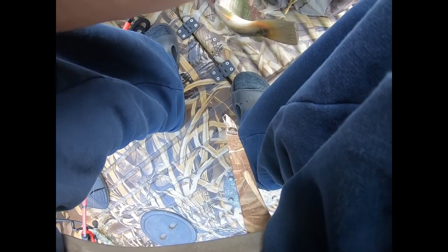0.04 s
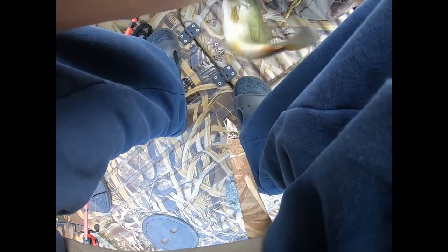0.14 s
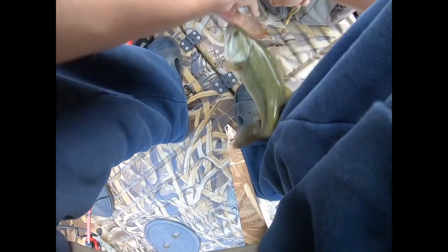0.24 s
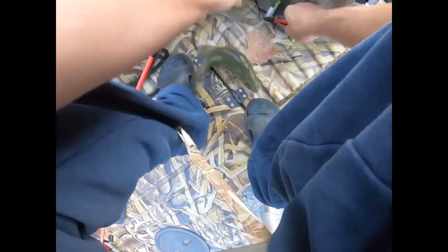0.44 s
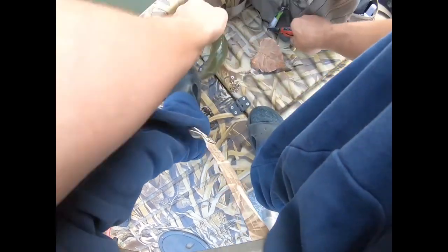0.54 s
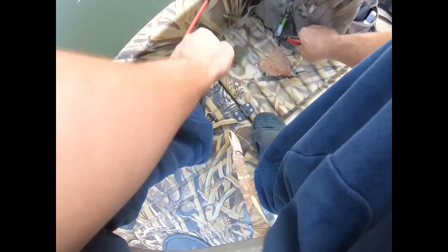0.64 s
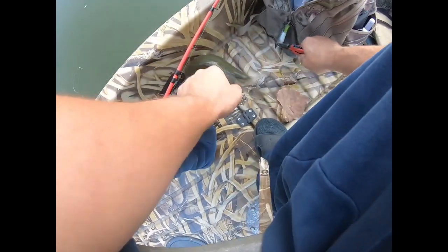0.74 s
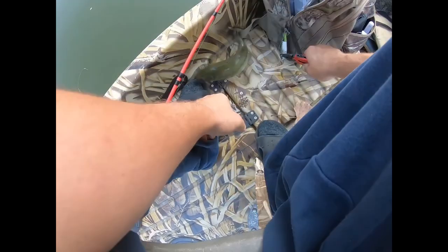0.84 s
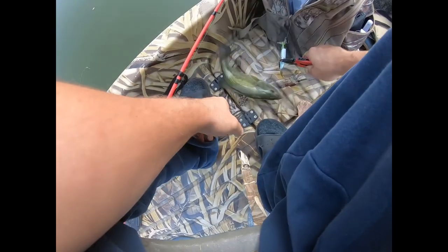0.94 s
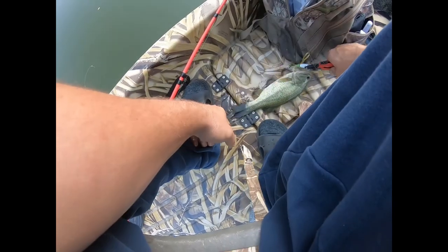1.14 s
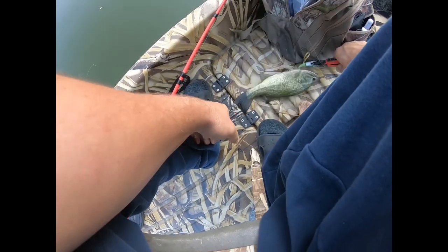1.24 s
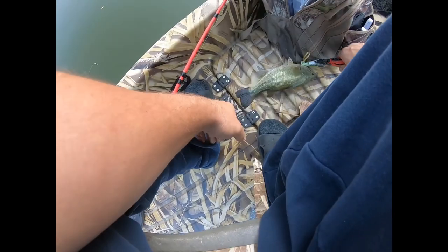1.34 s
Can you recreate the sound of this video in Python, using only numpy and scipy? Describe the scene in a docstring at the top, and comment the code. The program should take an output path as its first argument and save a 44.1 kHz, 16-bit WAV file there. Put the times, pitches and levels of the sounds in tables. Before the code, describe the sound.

A small wet fish flops on a boat floor, close by, over a low rumble and hum. Wet slaps begin at about 0.2 seconds as sleeves rustle. From 0.4 seconds its body thumps the floor in quick, uneven bursts, soon joined by sharp knocks. Loose tackle clicks between 0.75 and 1.05 seconds. The last thumps come near 1.2 seconds, followed by a few faint slaps.

```python
"""A small wet fish is dropped on the floor of a boat and flops about, close to the microphone.
The boat rumbles and hums from the start. At 0.2 s the first wet slaps of tail and fins come, and
sleeves rustle as an arm moves. From about 0.4 s the body thumps the floor and makes it ring, soon
joined by sharp knocks of head and tail. Loose tackle clicks between 0.75 and 1.05 s.
After the last thumps near 1.2 s, a few faint slaps are left over the rumble."""
import sys
import numpy as np
from scipy import signal
from scipy.fft import rfft, irfft, next_fast_len
from scipy.io import wavfile
from scipy.ndimage import map_coordinates

SR = 44100
rng = np.random.default_rng(int(sys.argv[2]) if len(sys.argv) > 2 else 0)


def to_wav(sig):
    """Store sig (one row per channel, or 1-D mono) as 16-bit WAV at the path in sys.argv[1].

    Samples outside -1..1 are clipped; the rate is SR.
    """
    pcm = np.clip(np.atleast_2d(sig), -1, 1) * 32767
    pcm = np.round(pcm).astype(np.int16)
    wavfile.write(sys.argv[1], SR, pcm.T)  # frames by channels


N = 61739

# The body landing: (time [s], level [dB], pitch [ratio], muffled above [Hz], ring length [ratio])
BODY_HITS = [(0.368, -24.5, 0.94, 443, 0.64), (.508, -16, 0.78, 403, 0.38), (0.5429, -8.5, 0.99, 700, 0.57),
             (0.583, -23, 0.86, 405, 1.9), (0.613, -9.5, 0.83, 407, 0.37), (0.6218, -13, 1.03, 480, 1.26),
             (.641, -20, 1.1, 507, 1.34), (0.66, -12, 1.0, 503, 0.3), (0.695, -10, .95, 414, 0.97),
             (0.757, -19.5, 0.75, 185, 1.96), (0.886, -4.5, 1.01, 175, 0.41),
             (0.923, -16.5, 1.13, 248, 1.24), (0.938, -16, 1.2, 278, 2.6), (0.9642, -7, 1.024, 321, 1.36),
             (1.12, -15, 0.96, 148, 1.6), (1.1593, -5.5, 1.07, 380, 0.73), (1.21, -24.5, 1.52, 348, 1.26),
             (1.235, -25, 1.27, 250, 1.4)]
# The floor's own notes, scaled by each hit. A fade time is how long a sound takes to drop 60 dB.
# (frequency [Hz], level [dB], fade time [s])
FLOOR_NOTES = [(94.6, -12, 0.18), (134.9, -4, 0.14), (202.5, -4, 0.092), (288.7, -8, 0.13),
               (338.4, -4, 0.094), (386.1, -4.5, 0.12), (475, -8.5, 0.084), (565.6, -11, 0.16)]
# Wet slaps: (time [s], level [dB], centre [Hz], fade time [s], level far from the centre [dB])
WET_SLAPS = [(0.174, -33, 4500, 0.015, -10), (0.2103, -15, 2930, 0.016, -16.5),
             (0.2162, -14, 14500, 0.01, -24.5), (0.2245, -25.5, 7100, 0.038, 2),
             (0.228, -22.5, 13000, 0.015, -28), (0.289, -26, 2300, 0.039, -33),
             (0.3217, -22, 4860, 0.042, -14.5), (0.3277, -20, 1910, 0.021, -63),
             (0.332, -19, 1930, 0.032, -44), (0.357, -28, 8600, 0.03, -12),
             (0.366, -21.5, 8500, 0.026, -12.5), (0.497, -24.5, 1680, 0.031, -3),
             (0.5096, -20, 2800, 0.025, -19), (0.54, -20.5, 3300, 0.028, -23),
             (0.5437, -10, 2740, 0.011, -8), (0.577, -21.5, 3900, 0.065, -5),
             (.5835, -21, 3600, 0.024, -28), (0.6115, -24, 4000, 0.036, -13),
             (0.6222, -14, 3500, 0.034, -3), (0.6345, -17.5, 4500, 0.019, -7),
             (0.639, -17.5, 4470, 0.043, -9), (0.657, -13, 6450, 0.016, -9),
             (0.665, -14.5, 8000, 0.013, -12), (0.6776, -20.5, 7000, 0.027, -13),
             (0.6943, -9.5, 5830, 0.014, -9.5), (0.728, -32, 7000, 0.039, -22),
             (0.774, -30.5, 4000, 0.035, 2), (0.831, -27, 7000, 0.036, -15),
             (0.8847, -17, 1310, 0.028, -21), (0.916, -25, 5000, 0.11, 3),
             (0.932, -17.5, 6800, 0.019, -7.5), (0.9372, -12.5, 5600, 0.011, -29),
             (.9442, -16, 4030, 0.0088, -9), (0.963, -19.5, 2600, 0.014, -1),
             (1.045, -30, 2850, 0.011, -22), (1.051, -35, 6900, 0.017, -25),
             (1.116, -26.5, 5260, 0.044, -12), (1.126, -27, 2080, 0.025, -9),
             (1.1475, -24.5, 5150, 0.02, -18), (1.1585, -16.5, 1520, 0.014, -9),
             (1.1694, -24.5, 1900, 0.015, -31), (1.209, -34, 3500, 0.069, -6),
             (1.232, -24.5, 3430, 0.026, -4), (1.2475, -22, 5700, 0.007, -19.5),
             (1.29, -30.5, 3500, 0.065, -9.5), (1.316, -33, 3000, 0.028, -12),
             (1.374, -31, 4020, 0.015, -11), (1.381, -34.5, 2020, 0.023, -57)]
# The tone all slaps start from: (frequency [Hz], level [dB])
SLAP_TONE = [(200, 3.5), (640, 3), (950, 6), (2000, 2), (3400, -2.5), (4800, -8.5), (7800, -2.5),
             (8900, -11), (10000, -8.5), (11200, -26.5), (14500, -23), (16500, -49)]
# Head and tail hitting a floor panel: (time [s], level [dB], pitch [ratio], muffled above [Hz])
HARD_HITS = [(.5445, -16.5, 1.52, 4500), (.584, -22.5, 1, 6000), (.624, -14.5, 1.02, 3500),
             (.639, -23, 0.97, 4000), (0.6579, -18, 1.22, 5960), (.696, -16, 0.944, 5970),
             (.8853, -15.5, 1.14, 1550), (.9639, -11.5, 0.91, 2600), (1.1592, -17.5, 1.13, 1690)]
# The panel's own notes, scaled by each hit: (frequency [Hz], level [dB], fade time [s])
PANEL_NOTES = [(865, 0.5, 0.011), (1012, 1.5, 0.0099), (1370, -0.5, 0.0064), (2150, -3.5, 0.003),
               (3510, -5.5, 0.012), (4860, 5, 0.0037)]
# The tail sliding: (peak time [s], level [dB], half length [s])
TAIL_SLIDES = [(0.226, -36.5, 0.015), (0.848, -30.5, 0.013)]
# The hiss of a slide: (frequency [Hz], level [dB])
SLIDE_TONE = [(1500, -12), (3200, 6.5), (4800, -4.5), (7800, 3), (9000, -11), (10000, -0.5), (11400, -42),
              (12500, -10), (14200, -16), (15500, -48)]
# Where the fish is: (time [s], left minus right [dB])
FISH_POSITION = [(.2, 4.5), (.4, 5.5), (.55, 1.5), (.9, -0.5), (1.3, -0.5)]
# The whole boat swaying: (peak time [s], level [dB], frequency [Hz], half length [s])
BOAT_SWAYS = [(.507, -16, 57.3, 0.012), (0.553, -13.5, 56, 0.011), (0.62, -15, 71, 0.0082),
              (0.804, -28, 89, 0.0079), (0.933, -25, 55.5, 0.029), (1.123, -20.5, 72.4, 0.012)]
# Loose tackle clicking: (time [s], level [dB], pitch [ratio])
TACKLE_CLICKS = [(0.7508, -26, 0.97), (0.7788, -20.5, 1), (0.8314, -20.5, 0.92), (0.8416, -19, 1.03),
                 (0.8519, -25.5, 1.13), (0.8667, -26, 1.03), (.899, -23, .94), (0.9043, -15.5, 0.94),
                 (0.9365, -12, 0.98), (1.0484, -26, 1.05)]
# The tackle's own notes, scaled by each click: (frequency [Hz], level [dB], fade time [s])
TACKLE_NOTES = [(2485, -9.5, 0.014), (2790, 2.5, 0.011), (3410, -1, 0.013), (7380, -22, 0.014)]
# The scrape in a click: (frequency [Hz], level [dB])
SCRAPE_TONE = [(600, 2), (3000, 0), (5000, -5), (8000, -11), (11500, -32), (16000, -42)]
# How loud the sleeves are: (time [s], level [dB])
SLEEVE_LEVEL = [(0, -61.5), (.2, -60.5), (.225, -54), (.27, -41.5), (.36, -47), (.44, -39.5), (.55, -47),
                (.68, -49.5), (.8, -46.5), (.93, -48), (.99, -52.5), (1.09, -55), (1.25, -51), (1.4, -52)]
# The tone of rubbing cloth: (frequency [Hz], level [dB])
SLEEVE_TONE = [(350, -23), (600, -9.5), (1150, 1), (1850, 4), (2700, 0.5), (4000, 0), (5500, -4), (8000, 1),
               (8900, -9.5), (9900, -6.5), (11300, -19.5), (14300, -20.5), (16000, -53)]
# The tone of the boat's rumble: (frequency [Hz], level [dB])
RUMBLE_TONE = [(15, -69), (25, -28.5), (76, -11), (97, -10), (203, -20.5), (259, -20), (324, -27.5),
               (446, -32.5), (645, -40), (786, -38.5), (1140, -37.5), (1420, -46.5), (9000, -85),
               (11700, -102), (19800, -120)]
# How loud the rumble is: (time [s], level [dB])
RUMBLE_LOUDNESS = [(0, -34.5), (.45, -33.5), (.8, -36), (1.07, -36), (1.28, -43), (1.4, -39.5)]
# The boat's two humming notes: (frequency [Hz], level [dB])
HUM_NOTES = [(92, -40.5), (116, -45.5)]
# How the hum is turned up and down: (time [s], added level [dB])
HUM_GAIN = [(0, 8.5), (.4, -1.5), (.8, -18), (1.3, -10)]
# A clean tone above the hum that swells early on: (time [s], level [dB])
DRONE_LEVEL = [(0, -54), (.2, -45), (.39, -37), (.6, -42.5), (1.4, -58)]
# How long the boat's sides echo: (frequency [Hz], fade time [s])
ECHO_FADE = [(100, 0.067), (400, 0.17), (1500, 0.11), (10000, 0.028)]
# How alike a noise is on the left and right: (frequency [Hz], likeness [0 to 1])
STEREO_LIKENESS = [(50, 0.93), (250, 1), (600, 0.48), (2000, 0.76), (4500, 0.58), (8000, 0.19),
                   (15000, 0.083)]
# The microphone's lean to one side: (frequency [Hz], left minus right [dB])
MIC_BALANCE = [(30, -4), (100, -0.5), (1000, -1), (3000, 0.1), (8000, 0.7), (13000, 1.5)]

SPATTER_PER_S = 850  # how fast the wet sounds flicker
LEFT_RIGHT = np.array([[.5], [-.5]])  # shares a left-minus-right level between the two sides


def body_thumps():
    """The body pushes the floor down and rings it; a fish lying flat cuts the ring short."""
    out = np.zeros((2, N))
    boom_top_hz = 527
    boom = lambda hz: 1 / (1 + (hz / boom_top_hz) ** 12) + .003
    for s, db, pitch, soft_hz, ring in BODY_HITS:
        tone = lambda hz: muffled(hz, soft_hz) * boom(hz)
        add(out, s, -amp(db) * blow(FLOOR_NOTES, pitch, ring, detune=0.016, tone=tone))
    return out


def wet_slaps():
    """Wet skin, tail and fins hit the floor, each time with a short, spattering burst of noise."""
    lead_s, width_octaves, spatter_db = .003, 0.96, 3
    out = np.zeros((2, N))
    t = np.maximum(np.arange(SR // 8) / SR - lead_s, 0)
    for s, db, centre_hz, fade_s, far_db in WET_SLAPS:
        near_centre = lambda hz: np.exp(-.5 * (np.log2((hz + 1) / centre_hz) / width_octaves) ** 2)
        tone = lambda hz: along(SLAP_TONE, hz) + far_db * (1 - near_centre(hz))
        shape = fade(t, rise_s=.04 * fade_s, fade_s=fade_s)
        spatter = amp(spatter_db * wobble(SPATTER_PER_S, len(t)))
        burst = noise(tone, len(t), shape * spatter)
        add(out, s - lead_s, amp(db) * np.sqrt(np.mean(shape ** 2)) * unit(burst))
    return out


def hard_knocks():
    """Head and tail smack the floor panel with one sharp crack each."""
    out = np.zeros((2, N))
    bass_cut_hz = 763
    thin = lambda hz: 1 - 1 / (1 + (hz / bass_cut_hz) ** 6)
    for s, db, pitch, soft_hz in HARD_HITS:
        tone = lambda hz: muffled(hz, soft_hz) * thin(hz)
        add(out, s, amp(db) * blow(PANEL_NOTES, pitch, ring=0.98, detune=0.052, tone=tone))
    return out


def tail_slides():
    """The wet tail brushes the floor with a bright, grainy hiss."""
    grain_db = 4.5
    level = sum(amp(db) * swell(s, half_s) for s, db, half_s in TAIL_SLIDES)
    grain = unit(amp(grain_db * wobble(SPATTER_PER_S, N)))
    return level * grain * noise(lambda hz: along(SLIDE_TONE, hz), N)


def boat_sways():
    """Shifting weight rocks the whole boat for a few deep swings."""
    t = np.arange(N) / SR
    return sum(amp(db) * np.cos(2 * np.pi * hz * (t - s)) * swell(s, half_s)
               for s, db, hz, half_s in BOAT_SWAYS)


def tackle_clicks():
    """Loose tackle rings briefly, a little differently each time, and scrapes where it touches."""
    out = np.zeros((2, N))
    t = np.arange(SR // 20) / SR
    scrape_db = -9
    for s, db, pitch in TACKLE_CLICKS:
        for k, (hz, note_db, fade_s) in enumerate(TACKLE_NOTES):
            note_hz = hz * pitch * (1 + rng.normal(0, 0.078))
            phase = 2 * np.pi * note_hz * t + rng.normal(0, 0.079, (2, 1))
            gain = (-1) ** k * amp(db + note_db + rng.normal(0, 1))
            add(out, s, gain * np.sin(phase) * fade(t, rise_s=0.00027, fade_s=fade_s))
    for s, db, pitch in TACKLE_CLICKS:
        scrape = noise(lambda hz: along(SCRAPE_TONE, hz / pitch), len(t))
        add(out, s, amp(db + scrape_db) * scrape * fade(t, rise_s=0.00042, fade_s=0.018))
    return out


def sleeves():
    """Cloth rubs with a grainy rustle as an arm moves."""
    grain_db = 1.6
    grain = unit(amp(grain_db * wobble(per_s=220, size=N)))
    return amp(curve(SLEEVE_LEVEL)) * grain * noise(lambda hz: along(SLEEVE_TONE, hz), N)


def boat_echo(sound):
    """The boat's sides throw back a short echo, different at each ear."""
    hz, t, hiss = signal.stft(rng.standard_normal((2, SR // 4)), SR, nperseg=256)
    dying_away = np.exp(-np.log(1000) * t / along(ECHO_FADE, hz)[:, None])
    echo = signal.istft(hiss * dying_away, SR, nperseg=256)[1]
    return signal.fftconvolve(sound, echo / np.linalg.norm(echo[0]), axes=1)[:, :N]


def boat_rumble():
    """The boat makes a low noise, with a wavering hum and a steadier tone above it."""
    t = np.arange(N) / SR
    waver_radians, drone_hz = 0.76, 209.9
    hum = sum(amp(db) * unit(np.sin(2 * np.pi * hz * t + waver_radians * wobble(per_s=10.49, size=N)))
              for hz, db in HUM_NOTES)
    drone = amp(curve(DRONE_LEVEL)) * unit(np.sin(2 * np.pi * drone_hz * t))
    rumble = amp(curve(RUMBLE_LOUDNESS)) * noise(lambda hz: along(RUMBLE_TONE, hz), N)
    return rumble + amp(curve(HUM_GAIN)) * hum + drone


def blow(notes, pitch, ring, detune, tone):
    """One push rings all the notes, detuned as the fish hits a new spot; tone turns Hz into gain."""
    hz = np.fft.rfftfreq(16384, 1 / SR)
    spectrum = 0
    for k, (note_hz, db, fade_s) in enumerate(notes):
        radians_per_s = 2 * np.pi * note_hz * pitch * (1 + detune * rng.standard_normal())
        damping = np.log(1000) / (fade_s * ring)
        resonance = radians_per_s / ((2j * np.pi * hz + damping) ** 2 + radians_per_s ** 2)
        spectrum = spectrum + (-1) ** k * amp(db) * SR * resonance
    return sudden_pulse(np.abs(spectrum) * tone(hz))


def sudden_pulse(spectrum):
    """The pulse that has this spectrum and all its energy as early as possible."""
    cepstrum = irfft(np.log(np.maximum(spectrum, 1e-6)))
    half = len(cepstrum) // 2
    folded_forward = np.r_[cepstrum[0], 2 * cepstrum[1:half], np.zeros(half)]
    return irfft(np.exp(rfft(folded_forward)))


def muffled(hz, soft_hz):
    """A soft hit barely rings the high notes."""
    return 1 / np.hypot(1, (hz / soft_hz) ** 2)


def noise(tone, size, shape=1):
    """Stereo noise as strong as its shape, centred in the bass, wide up high; tone turns Hz into dB."""
    def gains(hz):
        spread = np.arccos(np.clip(along(STEREO_LIKENESS, hz), -1, 1)) / 2
        return amp(tone(hz)) * [np.cos(spread), np.sin(spread)]
    mid, side = filtered(shape * rng.standard_normal((2, size)), gains)
    return unit(np.array([mid + side, mid - side])) * np.sqrt(np.mean(shape ** 2))


def filtered(sound, gain):
    """Turns each frequency up or down by gain(hz)."""
    size = sound.shape[-1]
    padded = next_fast_len(size + 4096)
    return irfft(rfft(sound, padded) * gain(np.fft.rfftfreq(padded, 1 / SR)), padded)[..., :size]


def fade(t, rise_s, fade_s):
    """A quick rise, then a fall of 60 dB every fade_s seconds."""
    return (1 - np.exp(-t / rise_s)) * np.exp(-np.log(1000) * t / fade_s)


def swell(s, half_s):
    """A smooth rise and fall around time s."""
    return np.exp(-((np.arange(N) / SR - s) / half_s) ** 2)


def wobble(per_s, size):
    """A smooth curve through per_s random values a second."""
    return map_coordinates(rng.standard_normal(4096), [np.arange(size) * per_s / SR], mode="wrap")


def curve(rows):
    """Joins (time, value) rows into one value per sample."""
    return np.interp(np.arange(N) / SR, *np.transpose(rows))


def along(rows, hz):
    """Reads between (frequency, value) rows, with octaves evenly spaced."""
    row_hz, values = np.transpose(rows)
    return np.interp(np.log(hz + 1), np.log(row_hz + 1), values)


def amp(db):
    """Turns decibels into a gain to multiply by."""
    return 10 ** (np.asarray(db) / 20)


def unit(sound):
    """Scales a sound to an average strength (rms) of 1."""
    return sound / np.sqrt(np.mean(sound ** 2) + 1e-20)


def add(track, s, sound):
    """Mixes a sound in at time s."""
    start = int(np.clip(round(s * SR), 0, N - 1))
    track[:, start:start + sound.shape[-1]] += sound[..., :N - start]


def scene():
    """Fish, tackle, sleeves and boat together; sharp sounds echo more than dull ones."""
    fish = (wet_slaps() + tail_slides() + hard_knocks()) * amp(curve(FISH_POSITION) * LEFT_RIGHT)
    sharp = fish + tackle_clicks()
    dull = body_thumps()
    echo = boat_echo(amp(db=-12.5) * sharp + amp(db=-26.5) * dull)
    return sharp + dull + echo + boat_sways() + sleeves() + boat_rumble()


def record(dry):
    """The microphone is brighter on the left and picks up nothing above top_hz."""
    top_hz = 16400
    return filtered(dry, lambda hz: amp(along(MIC_BALANCE, hz) * LEFT_RIGHT) * (hz < top_hz))


dry = scene()
out = record(dry)
to_wav(out)
```